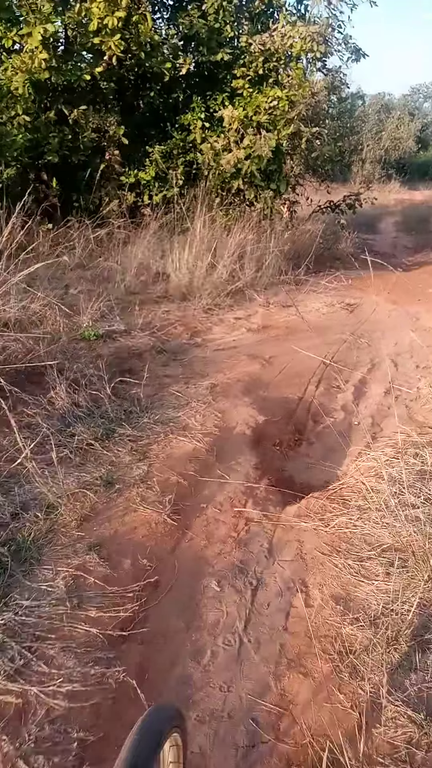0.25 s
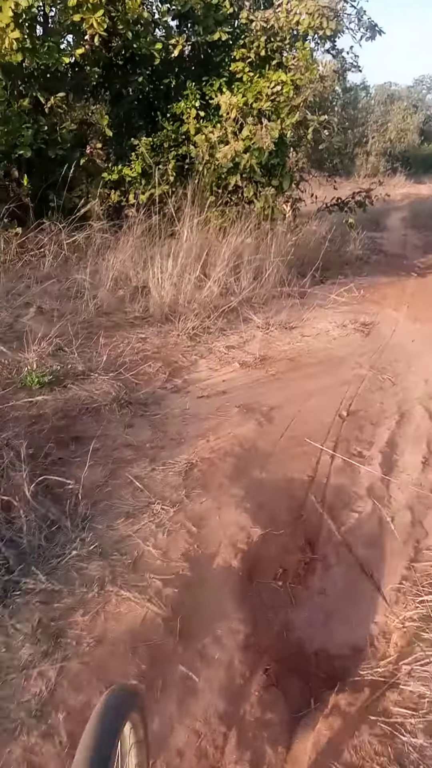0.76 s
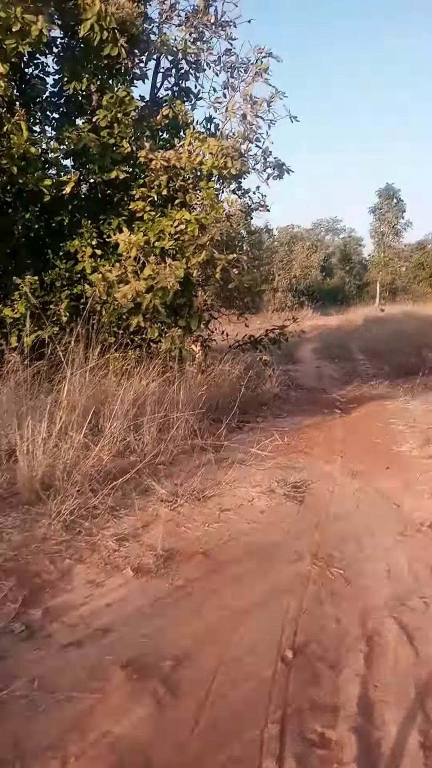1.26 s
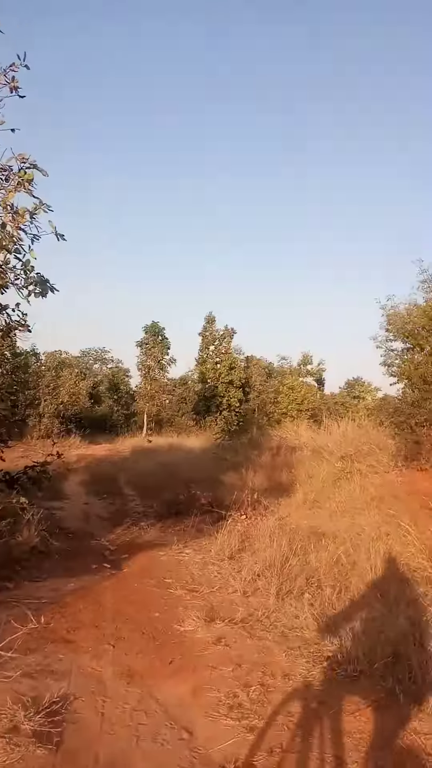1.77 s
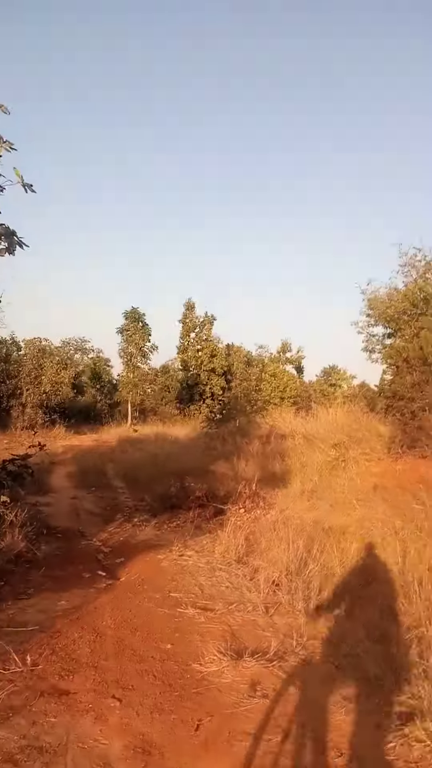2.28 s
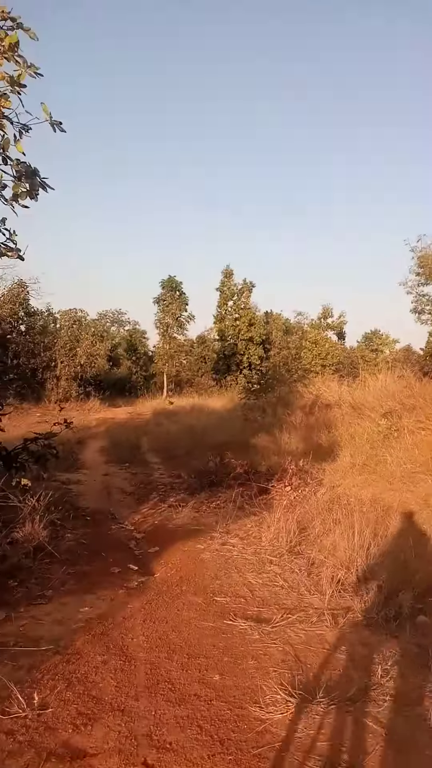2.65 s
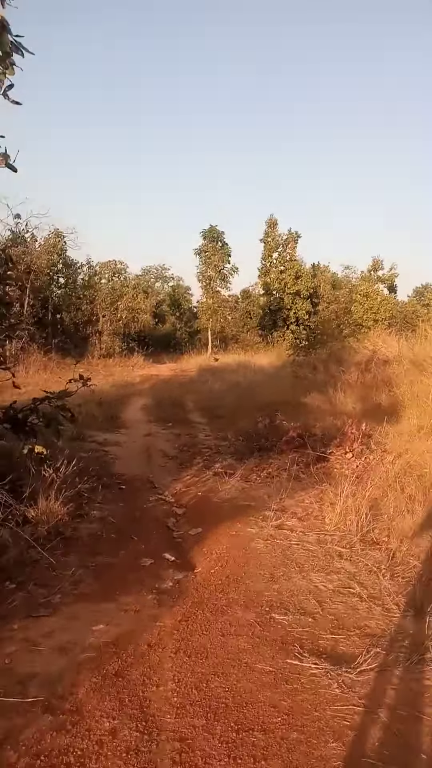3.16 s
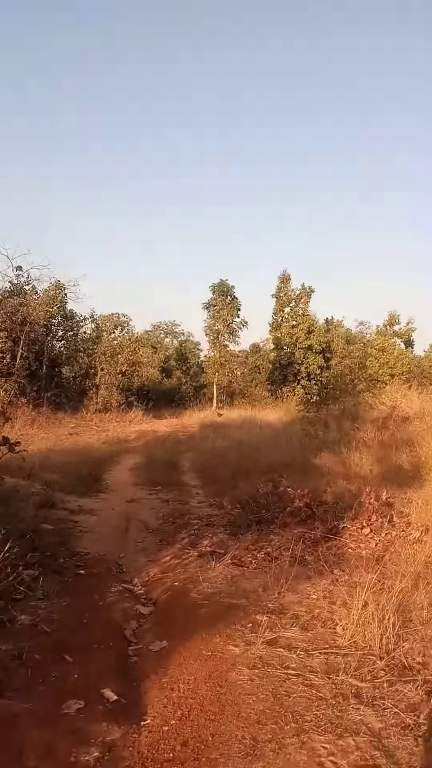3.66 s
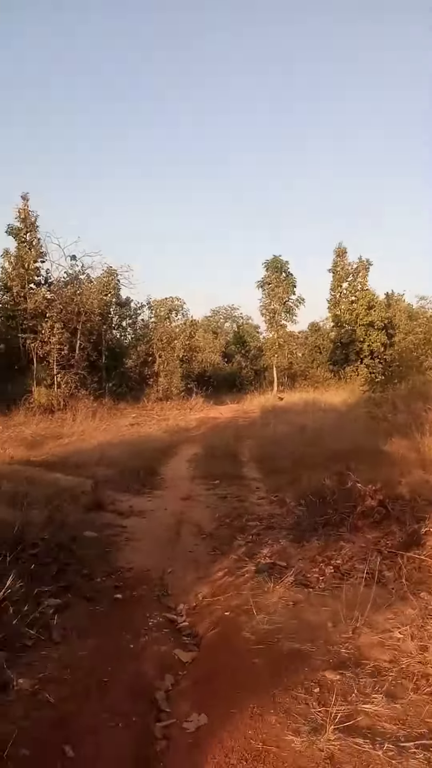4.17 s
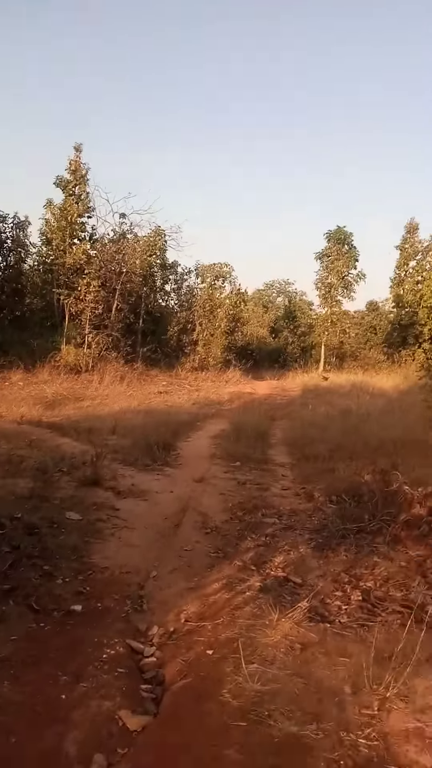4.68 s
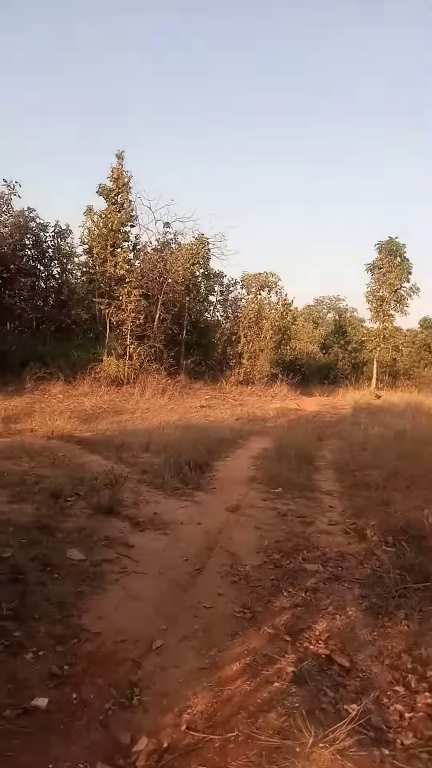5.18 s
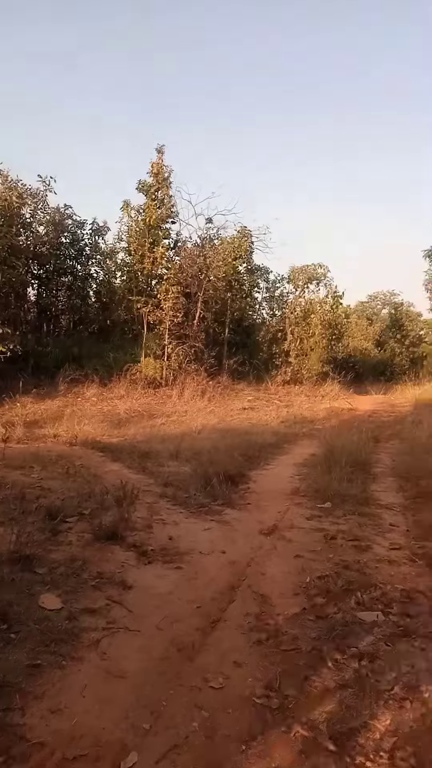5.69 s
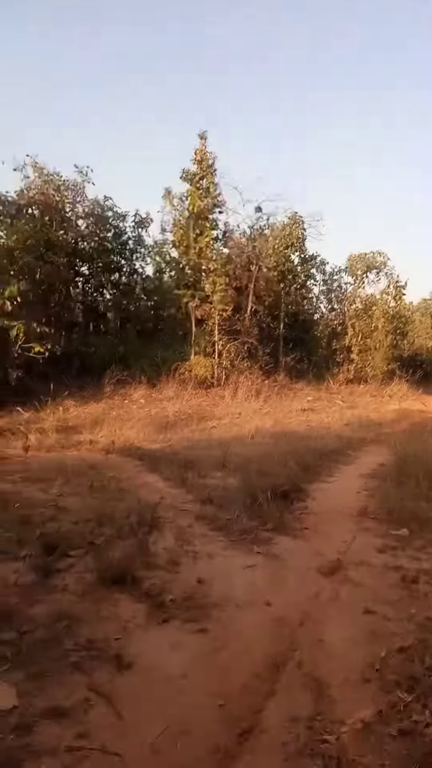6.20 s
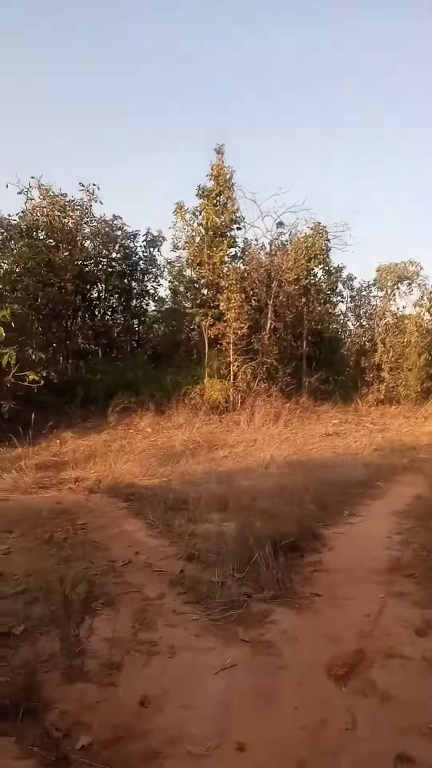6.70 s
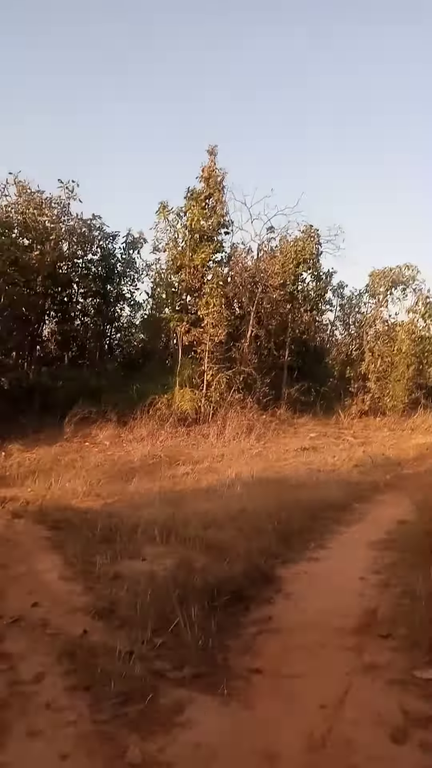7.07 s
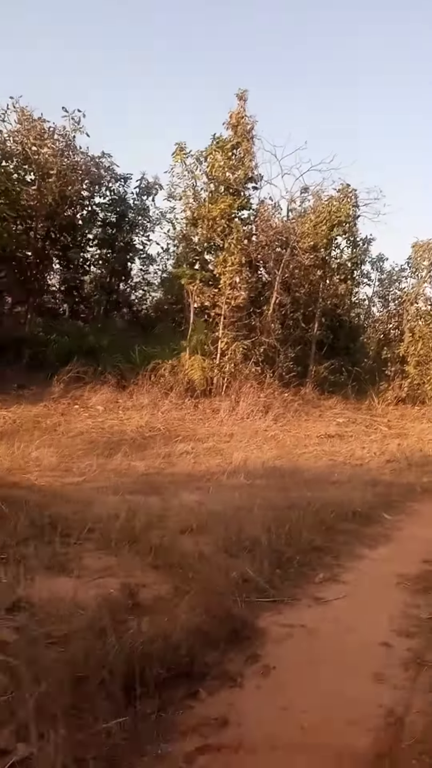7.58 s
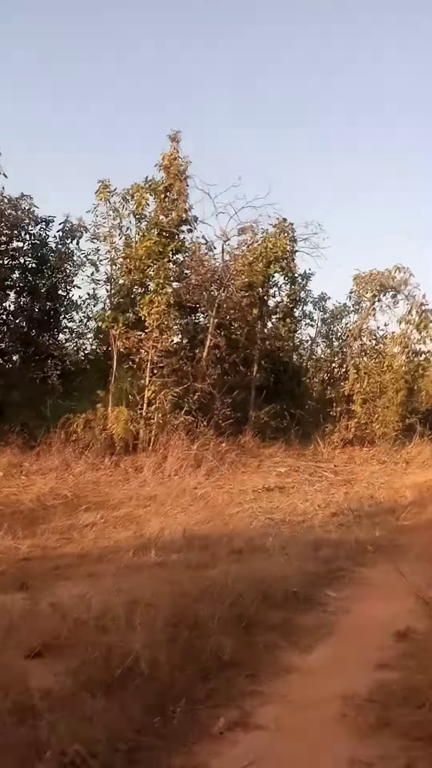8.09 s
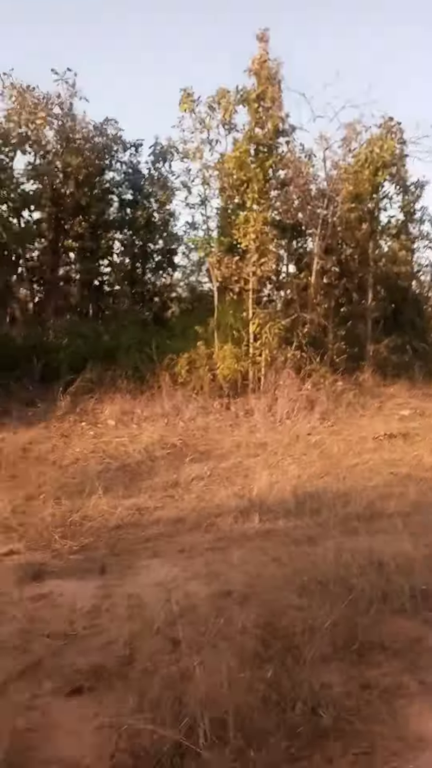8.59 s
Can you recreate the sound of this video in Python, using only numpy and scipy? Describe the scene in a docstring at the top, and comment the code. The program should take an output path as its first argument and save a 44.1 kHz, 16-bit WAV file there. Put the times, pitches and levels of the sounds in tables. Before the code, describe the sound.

A bicycle rolls along a dry dirt track, tyres crunching grit, twigs snapping, leaves crushing, loose metal rattling and saddle springs squeaking.

```python
"""On a dry dirt track a bicycle rolls along, heard through one small hand-held microphone.
The tyres crunch grit in coloured grains, twigs snap as short damped sines and leaves crush in swells of cracks.
Loose metal rattles in dying showers of contacts, the frame knocks and a small part pings as ringing modes.
Saddle springs squeak in fluttering tones, the chain ticks in bright scrapes, wind buffets the microphone
in low noise bands and thumps, and a small bird chirps twice in rising whistles."""
import sys
import numpy as np
from scipy import signal
from scipy.fft import rfft, irfft
from scipy.io import wavfile

SR = 44100
rng = np.random.default_rng(int(sys.argv[2]) if len(sys.argv) > 2 else 0)


def unload_audio(sound):
    """Save the sound as a 16-bit wav file, at the path given as the first command line argument."""
    columns = np.transpose(np.atleast_2d(sound))
    # keep every value between -1 and 1, then stretch to whole-number steps
    steps = np.round(np.clip(columns, -1, 1) * 32767)
    wavfile.write(sys.argv[1], SR, steps.astype(np.int16))


N = 390285

# noise colour of brittle or loose contacts, for leaves and rattles: (frequency [Hz], relative density [dB per Hz])
CLATTER_COLOUR = [(150, -26), (250, -10), (1110, -15), (1670, -1.5), (2350, -2), (2560, -9), (3290, -8),
                  (6390, -5), (7520, -6), (8460, -18), (11000, -67.5)]
TILT_HZ = 2670   # brightness settings act above this


def from_db(db):
    """Decibels to gain."""
    return 10 ** (np.asarray(db) / 20)


def rms_one(x):
    """Scale to unit rms."""
    return x / np.sqrt(np.mean(x ** 2) + 1e-20)


def in_time(rows):
    """Columns of a curve table, one value a sample."""
    s, *columns = np.transpose(rows)
    return [np.interp(np.arange(N) / SR, s, column) for column in columns]


def drift(rate):
    """Slow random curve of rms 1: coarse noise through two equal one-pole low-passes at a rate in Hz."""
    step = 40   # samples between the coarse points
    pole = np.exp(-2 * np.pi * rate * step / SR)
    noise = rng.standard_normal(N // step + 2002)
    slow = signal.lfilter([1], [1, -2 * pole, pole * pole], noise)[2000:]   # skip the filter's start
    return np.interp(np.arange(N) / step, np.arange(len(slow)), rms_one(slow))


def ring(clicks, hz, t60):
    """A damped mode: a unit click sets a sine of height 1 ringing, 60 dB down after t60 seconds."""
    radius = from_db(-60 / (t60 * SR))
    angle = 2 * np.pi * hz / SR
    resonator = [1, -2 * radius * np.cos(angle), radius * radius]
    return signal.lfilter([0, np.sin(angle)], resonator, clicks + 1e-18)


def swell(s, length):
    """A smooth rise and fall around a moment, both in seconds."""
    return np.exp(-2 * ((np.arange(N) / SR - s) / (length / 2)) ** 2)


def grains(per_s, spread_db):
    """Random clicks of either sign, most of them small and a few large."""
    sizes = from_db(spread_db * np.minimum(rng.exponential(1, N), 5))
    sizes = sizes * rng.choice([-1, 1], N)
    return sizes * (rng.random(N) < per_s / SR)


def colour(x, spectrum, patchy_db, rate, dull=1, bright=1):
    """Shape a sound by spectrum points to rms 1, then let each half octave flicker on its own.

    The gain passes from dull to bright over the octave above the tilt."""
    hz, db = np.transpose(spectrum)
    octave = np.log2(np.maximum(np.fft.rfftfreq(N, 1 / SR), 1))
    shaped = rfft(x) * from_db(np.interp(octave, np.log2(hz), db))
    shaped /= np.std(irfft(shaped, N))
    out = np.zeros(N)
    for centre in np.arange(6.5, 13.6, .5):   # octaves above 1 Hz
        triangle = np.maximum(1 - 2 * np.abs(octave - centre), 0)
        band = irfft(shaped * triangle, N)
        share = np.clip(centre - np.log2(TILT_HZ), 0, 1)
        flicker = from_db(patchy_db * drift(rate))
        out += band * flicker * dull ** (1 - share) * bright ** share
    return out


def wind():
    """Lumpy low noise on the microphone port, each octave gusting on its own, with short thumps on top."""
    # strength of the wind: (time [s], level before each octave's own growth [dB])
    strength = [(0.0, -82), (1.33, -77), (1.7, -84.5), (2.46, -64.5), (3.1, -82.5), (4.24, -62.5),
                (4.49, -69), (5.49, -70.5), (5.82, -54.5), (6.51, -59), (7.15, -50), (7.81, -53.5),
                (8.85, -60)]
    # low thumps of gusts on the microphone: (middle [s], pitch [Hz], level [dB], length [s])
    thumps = [(7.917, 179, -31, 0.045), (7.95, 166, -24.5, 0.014), (8.697, 102, -31, 0.045)]
    mean_db = -66.5   # about this level the octaves grow at their own rates
    level_db, = in_time(strength)
    out = np.zeros(N)
    # (centre [Hz], offset [dB], growth [dB per dB of wind])
    for hz, db, growth in ((48, -4.5, 0.75), (80.6, -1.5, 0.84), (174, 0.0, 0.73)):
        octave = signal.butter(2, [hz / np.sqrt(2), hz * np.sqrt(2)], "band", fs=SR, output="sos")
        gust_db = mean_db + db + growth * (level_db - mean_db) + 4.7 * drift(7.0)
        rumble = rms_one(signal.sosfilt(octave, rng.standard_normal(N)))
        out += rumble * from_db(gust_db)
    t, waver = np.arange(N) / SR, drift(47.0)
    for s, hz, db, length in thumps:
        tone = np.sin(2 * np.pi * hz * (t - s) + 0.95 * waver)
        out += from_db(db) * swell(s, length) * tone
    return out


def bird():
    """Rising whistles: pure sines that sweep upwards under a flat-topped swell."""
    # chirps: (middle [s], pitch at the middle [Hz], rms level at full height [dB], length of the swell [s])
    chirps = [(7.919, 4950, -42.5, 0.068), (8.328, 4700, -43, 0.04)]
    rise_hz_per_s = 26000
    out, t = np.zeros(N), np.arange(N) / SR
    for s, hz, db, length in chirps:
        phase = 2 * np.pi * (hz * (t - s) + rise_hz_per_s * (t - s) ** 2 / 2)
        shape = np.minimum(2 * swell(s, length), 1)
        out += np.sqrt(2) * from_db(db) * shape * np.sin(phase)
    return out


def chain():
    """Links meet the teeth at a nearly even rate; each meeting is a short bright scrape that rings the links."""
    # chain link modes: (frequency [Hz], relative level [dB], t60 [s])
    link_modes = [(4575, -7.5, 0.026), (6550, 3, 0.016), (7270, -10, 0.04)]
    links_per_s, links_db, hiss_db = 29, -50, -18.5   # the hiss is relative to the links
    turns = np.cumsum(links_per_s * (1 + .08 * drift(2.4))) / SR
    fade = np.exp(-(turns % 1) / 0.15)   # restarts at every link
    scrape = fade * from_db(2.9 * drift(12.0)) * rng.standard_normal(N)
    links = rms_one(sum(from_db(db) * ring(scrape, hz, t60) for hz, db, t60 in link_modes))
    treble = signal.butter(2, [5000, 7600], "band", fs=SR, output="sos")
    hiss = rms_one(signal.sosfilt(treble, scrape))
    return from_db(links_db) * (links + from_db(hiss_db) * hiss)


def squeaks():
    """Stick-slip in a saddle spring: a wavering, fluttering tone with its octave, quick to start, then fading."""
    # squeaks: (start [s], pitch [Hz], level before the envelope [dB], octave relative to the tone [dB])
    spring_tones = [(0.989, 1646, -27.5, -18), (1.256, 1570, -30.5, -30), (1.692, 1663, -33.5, -12),
                    (1.785, 1915, -34, -12), (2.044, 1567, -22.5, -16), (2.259, 1586, -22.5, -18),
                    (2.337, 1610, -30, -10), (2.562, 1570, -30, -18), (2.702, 2120, -30.5, -10),
                    (2.728, 1600, -34.5, -11), (2.885, 1574, -29.5, -14), (3.048, 1700, -27, -0.5),
                    (3.09, 1767, -27.5, -2), (3.525, 1824, -32.5, -1.5), (6.295, 1722, -19.5, -15),
                    (6.477, 1640, -21, -25), (7.799, 1690, -24.5, -3.5), (7.88, 1690, -40, -1),
                    (8.005, 2090, -26.5, -12)]
    fade_s, attack_s = 0.029, 0.0097
    out, t, waver = np.zeros(N), np.arange(N) / SR, drift(58.0)
    for s, hz, db, octave_db in spring_tones:
        phase = 2 * np.pi * hz * t + .6 * waver
        since = np.maximum(t - s, 0)
        shape = (1 - np.exp(-since / attack_s)) * np.exp(-(since / fade_s) ** 2)
        tone = np.sin(phase) + from_db(octave_db) * np.sin(2 * phase)
        out += from_db(db) * shape * tone
    flutter = from_db(3 * drift(90))
    return out * flutter


def knocks():
    """Each jolt strikes every frame mode with a strength of its own; one small metal part pings once."""
    # hard jolts through the frame: (time [s], strength before each mode's level [dB])
    jolts = [(4.924, -29), (5.843, -25), (6.876, -26.5), (7.041, -22)]
    # frame modes: (frequency [Hz], mean relative level [dB], t60 [s])
    frame_modes = [(475, -4.5, 0.072), (1006, 5, 0.016), (1168, -5, 0.076), (1340, 0, 0.034)]
    ping_s, ping_hz, ping_db, ping_t60_s = 8.429, 3900, -14, 0.024
    s, db = np.transpose(jolts)
    favour_db = 3 * rng.standard_normal((len(jolts), len(frame_modes)))
    ping_click = np.arange(N) == round(ping_s * SR)
    out = ring(from_db(ping_db) * ping_click, ping_hz, ping_t60_s)
    for (hz, mode_db, t60), own_db in zip(frame_modes, favour_db.T):
        blows = np.zeros(N)
        blows[(s * SR).astype(int)] = from_db(db + mode_db + own_db)
        out += ring(blows, hz, t60)
    # the knocks carry no deep bass
    return signal.sosfilt(signal.butter(2, 300, "high", fs=SR, output="sos"), out)


def leaves():
    """Dry leaves crush in swells of fine brittle cracks."""
    # crushes: (middle [s], level [dB], length of the swell [s])
    crushes = [(1.13, -37, 0.13), (1.385, -30, 0.066), (1.899, -35.5, 0.11), (2.325, -30.5, 0.15),
               (2.586, -36, 0.087), (4.908, -40, 0.098), (5.909, -27, 0.027), (6.148, -30.5, 0.02),
               (6.341, -29.5, 0.1), (6.548, -27, 0.054), (6.85, -25, 0.061), (6.947, -27, 0.018),
               (7.012, -21, 0.038), (7.089, -22.5, 0.038), (7.364, -26, 0.064), (7.503, -25.5, 0.2),
               (8.124, -24.5, 0.077), (8.496, -29.5, 0.055)]
    clumpy = grains(4000, spread_db=2.5) * from_db(2.0 * drift(59.0))
    cracks = colour(clumpy, CLATTER_COLOUR, patchy_db=3.5, rate=30.0)
    return cracks * sum(from_db(db) * swell(s, length) for s, db, length in crushes)


def snaps():
    """A twig snaps in a fast-damped cycle or two with a bright edge, then splinters; small litter cracks at random."""
    # twigs and leaves snapping: (time [s], level of the crack before damping [dB], pitch [Hz])
    breaks = [(1.713, -21.5, 3600), (2.349, -10, 1800), (2.554, -25, 4200), (2.846, -24.5, 1630),
              (3.4207, -14.5, 1620), (3.646, -21, 1590), (4.0276, -9.5, 2240), (4.13, -11.5, 2420),
              (4.2049, -17, 2130), (4.274, -19, 2530), (4.2868, -9.5, 2040), (4.298, -11, 2400),
              (4.355, -10.5, 2180), (4.5411, -17, 2020), (4.5483, -14.5, 1700), (4.59, -12.5, 2370),
              (4.7191, -14, 2270), (4.814, -17.5, 2300), (4.8229, -17.5, 2030), (4.9205, -13, 2050),
              (5.0992, -14, 1740), (5.132, -17.5, 2320), (5.3541, -13, 2200), (5.4863, -13, 2200),
              (5.5033, -12.5, 2210), (5.586, -17.5, 1740), (5.6351, -11.5, 2400), (5.6807, -9, 1900),
              (5.745, -15, 2240), (6.0821, -10, 2060), (6.583, -12, 2200), (6.964, -19, 2200),
              (7.478, -7.5, 1790), (8.3855, -4, 1540)]
    # small litter cracks: (time [s], mean rate before heaping [per s])
    litter = [(0, 1.2), (3.9, 3.7), (4.2, 133), (5.8, 250), (7.6, 41), (7.75, 3.1), (8.85, 4.8)]
    out, t = np.zeros(N), np.arange(round(0.065 * SR)) / SR
    chance = rng.standard_normal((len(breaks), len(t)))
    for (s, db, hz), noise in zip(breaks, chance):
        body = np.sin(2 * np.pi * hz * t) * np.exp(-t * hz / 1.35)
        edge = .2 * noise * np.exp(-t / .0005)
        splinters = .007 * noise ** 3 * np.exp(-t / .01)   # the cube leaves a few large ones
        at = round(s * SR)
        out[at:at + len(t)] += from_db(db) * (body + edge + ring(splinters, hz, 0.0031))
    per_s, = in_time(litter)
    per_s = per_s * from_db(5.9 * drift(5.7))   # litter lies in heaps
    for hz in (1760, 2200, 3120, 4200):
        out += from_db(-37) * ring(grains(per_s, spread_db=3.5), hz, 4.7 / hz)
    # a twig is too small to radiate bass
    return signal.sosfilt(signal.butter(2, 900, "high", fs=SR, output="sos"), out)


def rattles():
    """A bump strikes once, then a dying shower of contacts clatters and rings the metal, retuned each time."""
    # loose parts shaken by a bump: (time [s], strength [dB], brightness above the tilt [dB])
    bumps = [(0.2599, -20, 4), (0.3442, -12.5, 4), (0.867, -19.5, 7), (0.897, -24, 6.5), (0.9924, -27, 5),
             (1.42, -20, 2), (1.4481, -24, 4), (1.692, -27.5, 6), (2.2598, -22, 0), (2.2735, -16, -2),
             (2.318, -27, 8), (2.7073, -29.5, 8), (2.89, -27, 8), (3.04, -26, 10), (3.082, -18, 5),
             (3.1986, -21, 4.5), (3.5577, -13, 4), (4.3072, -13.5, -0.5), (4.612, -21, -3),
             (5.077, -17, -6), (5.203, -27, 6), (5.4005, -22, 0), (5.508, -19, -7), (5.846, -9, -2.5),
             (5.896, -20.5, 10.5), (6.126, -13.5, -5.5), (6.291, -14, 1), (6.3813, -12, -4),
             (6.4155, -13, -10), (6.474, -22.5, 17.5), (6.5398, -14.5, -2.5), (6.605, -13.5, -4),
             (6.6339, -12, 2.5), (6.71, -19.5, 9.5), (6.739, -14, -7), (6.8081, -10, -4.5),
             (6.8779, -17.5, 12.5), (7.002, -19, 4.5), (7.0404, -12.5, 7.5), (7.1139, -7.5, 0.5),
             (7.1819, -9, 2), (7.2306, -15.5, 0.5), (7.262, -34, 17), (7.3054, -27.5, 18),
             (7.69, -12.5, 3.5), (8.001, -22, 8), (8.066, -18.5, 6.5), (8.259, -19.5, 10),
             (8.3584, -8, -1.5), (8.3855, -10, -4), (8.4298, -25, 11.5), (8.623, -28.5, 23),
             (8.739, -20, 0.5)]
    # what the loose metal rings with: (mean frequency [Hz], mean relative level [dB], t60 [s])
    metal_modes = [(1590, -29, 0.2), (1727, -18, 0.25), (2150, -20.5, 0.34), (2400, -12, 0.13),
                   (3136, -24, 0.059), (6850, -9, 0.045)]
    ring_db, crest_db = -22.5, 16   # share of a contact that goes into the modes; peak over rms of a rattle
    rattle_t60_s, settle_t60_s, settle_db = 0.1, 0.45, -25   # a fast decay, then the parts settle more slowly
    blow_db, blow_s = -1, 0.0076   # extra force of the first blow, and its fade
    detune, favour_db = .03, 3   # spread of each mode's split into a pair (a share), and of its level
    dull_force, bright_force, rings = np.zeros((3, N + SR))
    contacts = rms_one(grains(4000, spread_db=2.5)) * from_db(0.91 * drift(86.0))
    t = np.arange(round(settle_t60_s * SR)) / SR
    dying = from_db(-60 * t / rattle_t60_s)
    dying += from_db(settle_db - 60 * t / settle_t60_s)
    dying += from_db(blow_db) * np.exp(-t / blow_s)
    chance = rng.standard_normal((len(bumps), 2, len(metal_modes)))
    for (s, db, bright_db), (offsets, favours) in zip(bumps, chance):
        at = round(s * SR)
        force = from_db(db - crest_db) * dying
        dull_force[at:at + len(t)] += force
        bright_force[at:at + len(t)] += force * from_db(bright_db)
        contacts[at + 20] = 0.81   # the first contact
        shower = force * np.resize(contacts[at:at + len(t)], len(t))
        for (hz, mode_db, t60), offset, favour in zip(metal_modes, offsets, favours):
            gain_db = mode_db + ring_db + favour_db * favour
            if hz > TILT_HZ:
                gain_db += bright_db
            pair = sum(ring(shower, hz * (1 + detune * offset * side), t60) for side in (1, -1))
            rings[at:at + len(t)] += from_db(gain_db) * pair
    clatter = colour(contacts, CLATTER_COLOUR, patchy_db=3.0, rate=22.0,
                     dull=dull_force[:N], bright=bright_force[:N])
    # small parts radiate no bass
    return signal.sosfilt(signal.butter(2, 350, "high", fs=SR, output="sos"), rings[:N] + clatter)


def tyres():
    """Grit crushed in dense grains; the ground is uneven, so the crunch clumps, more so where it is loud."""
    # tyres on the ground: (time [s], crunch level [dB], brightness above the tilt [dB])
    roll = [(0.0, -43, 4), (1.31, -39.5, 1), (1.6, -43, 4), (4.11, -42, 1.5), (5.3, -41.5, 0),
            (5.96, -38.5, 0.5), (6.43, -33.5, 2.5), (7.35, -34.5, 10.5), (7.86, -42.5, 2.5),
            (8.21, -37.5, 6.5), (8.85, -46, 8.5)]
    # noise colour of the grit: (frequency [Hz], relative density [dB per Hz])
    crunch_colour = [(88, -59.5), (150, -25), (233, -13.5), (310, -3), (944, -6.5), (1570, 2.5), (2050, 4),
                     (2830, -8.5), (5010, -9.5), (6570, -3.5), (7520, -11.5), (8460, -16), (11000, -66)]
    level_db, bright_db = in_time(roll)
    clump_db = .2 * (level_db + 52)
    grit = grains(5000, spread_db=2.8) * from_db(clump_db * drift(30.0))
    crunch = colour(grit, crunch_colour, patchy_db=2.6, rate=28.0, bright=from_db(bright_db))
    return from_db(level_db) * crunch


def scene():
    """All sources reach one microphone in the open air."""
    surroundings = wind() + bird()
    bicycle = chain() + squeaks() + knocks() + rattles()
    ground = leaves() + snaps() + tyres()
    return (surroundings + bicycle + ground)[None]


def record(dry):
    """The deepest bass and the top roll off, peaks are rounded, then the top is cut."""
    soft = signal.sosfilt(signal.butter(2, [45, 8000], "band", fs=SR, output="sos"), dry)
    rounded = .55 * np.tanh(soft / .55)
    return signal.sosfilt(signal.cheby2(12, 52, 8750, fs=SR, output="sos"), rounded)   # 52 dB down from 8750 Hz


dry = scene()
out = record(dry)
unload_audio(out)
```